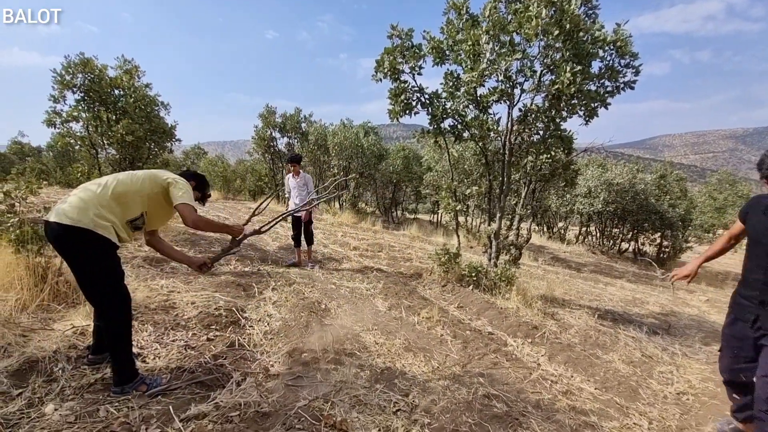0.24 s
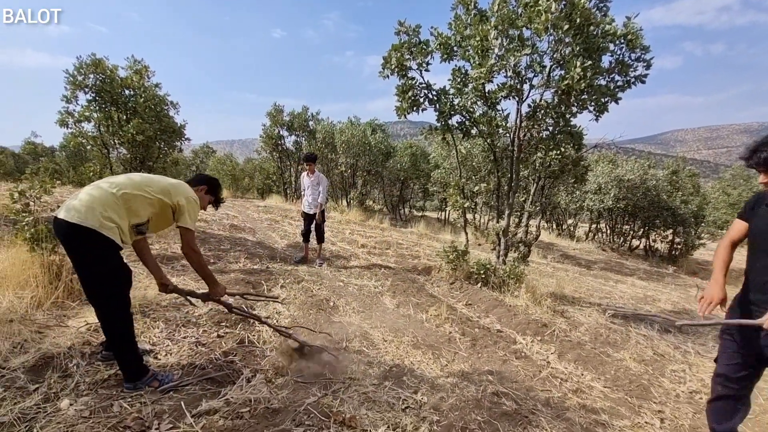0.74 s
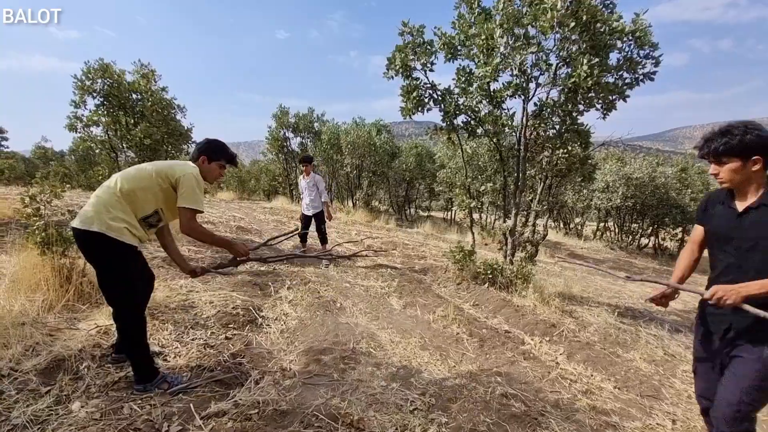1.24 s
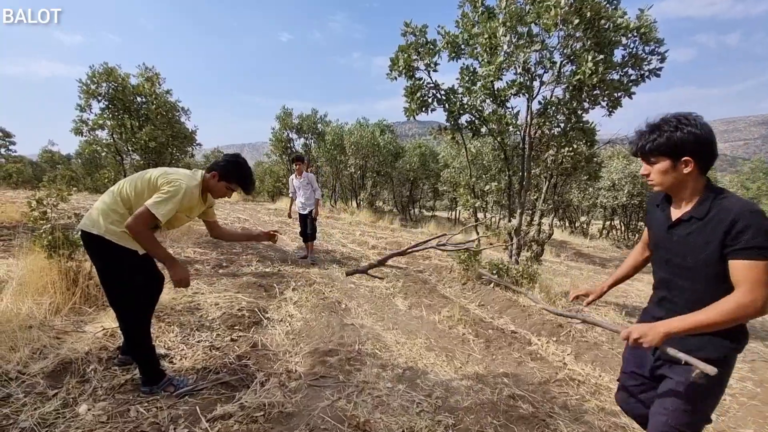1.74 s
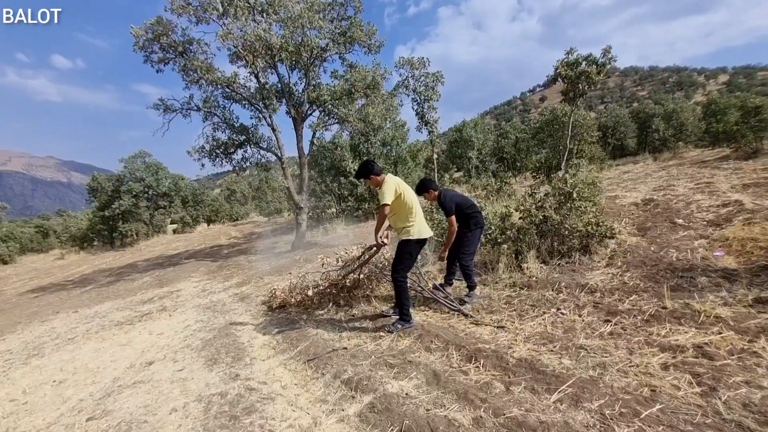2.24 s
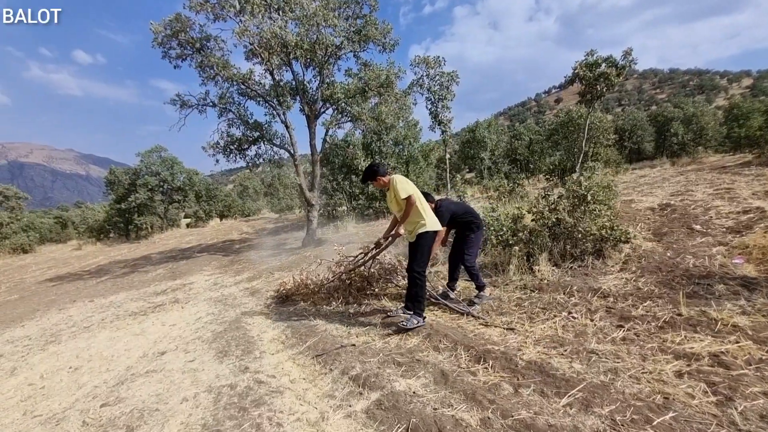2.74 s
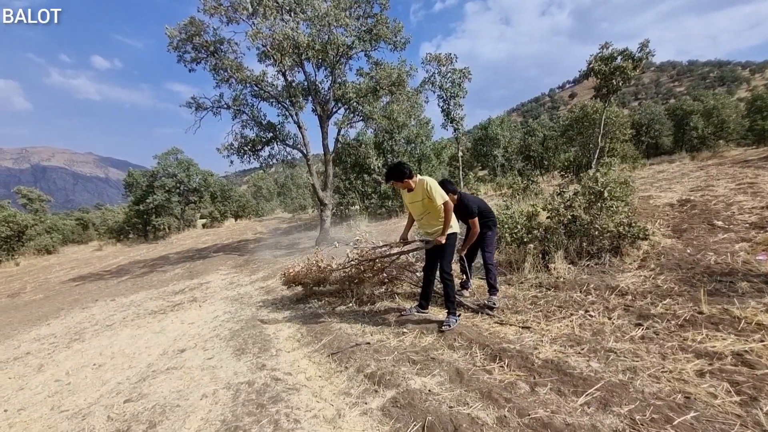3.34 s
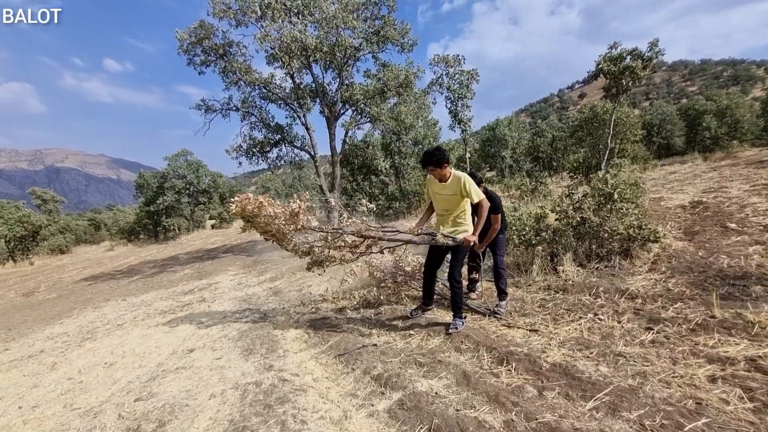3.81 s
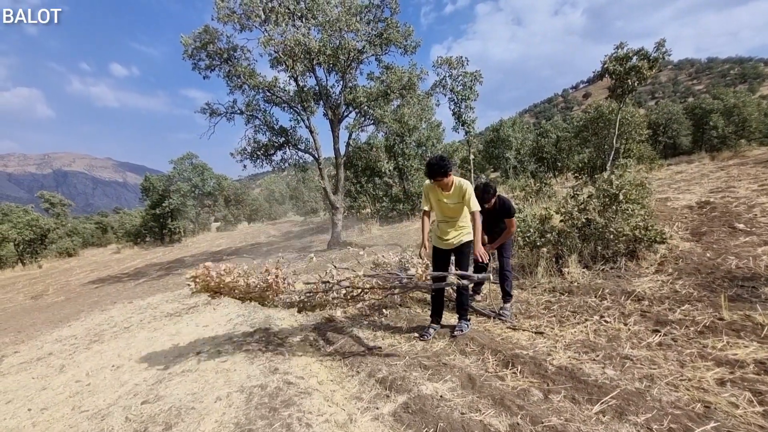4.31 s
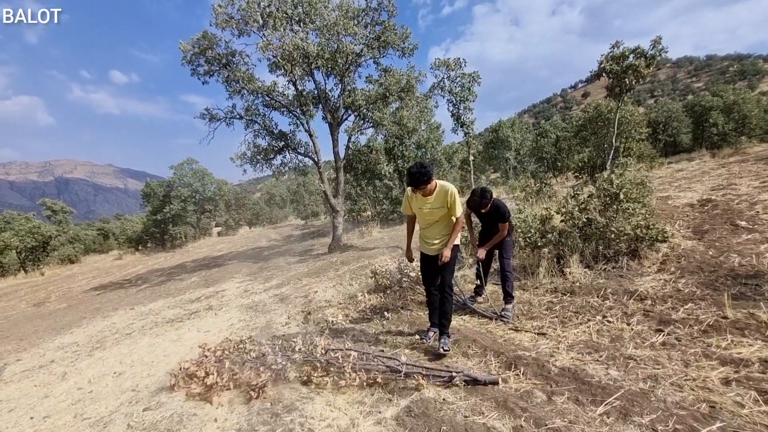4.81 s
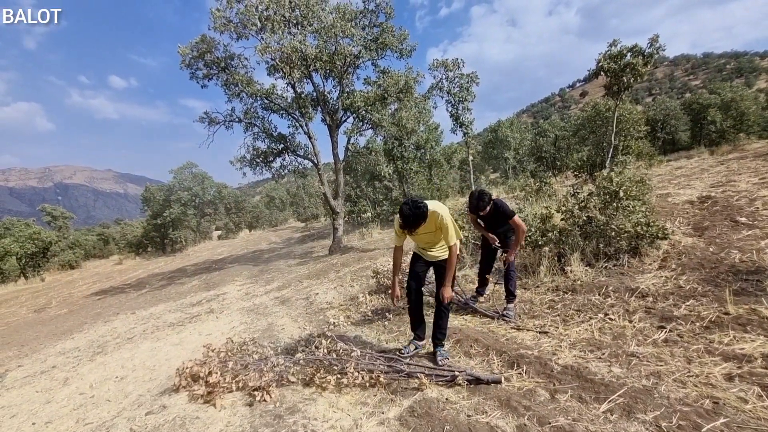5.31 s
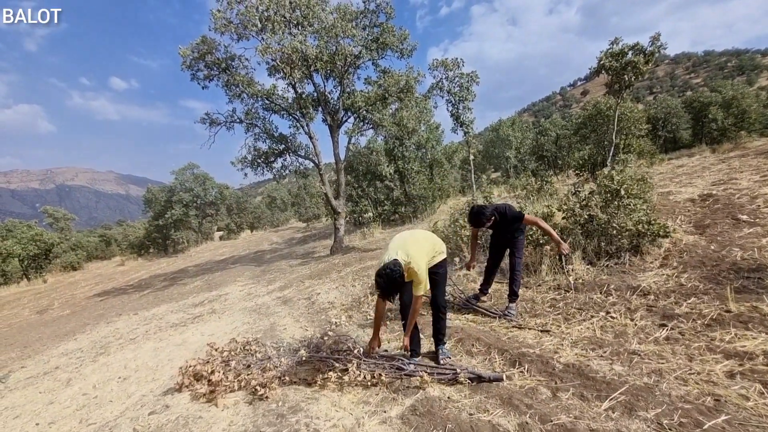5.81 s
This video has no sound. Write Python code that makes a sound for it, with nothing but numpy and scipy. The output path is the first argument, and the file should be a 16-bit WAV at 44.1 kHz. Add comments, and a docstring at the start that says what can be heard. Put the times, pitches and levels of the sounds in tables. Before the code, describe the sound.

Dry branches beaten on the ground snap sharply amid faint grass rustle, then leafy brush crackles, swishes and drops on a breezy hillside.

```python
"""Dry branches are beaten on the ground: twigs snap as short noise bursts that ring, and sticks rap.
Leafy brush is dragged, lifted and dropped on a hillside: its rustle is noise made of tiny cracks.
The hand-held camera body knocks with a hollow ring; wind noise and slaps hit mostly the left port.
Two scenes follow each other: near 1.94 s the rustle switches abruptly from dry grass to dead leaves."""
import sys
import numpy as np
from scipy import signal
from scipy.fft import rfft, irfft
from scipy.io import wavfile
from scipy.ndimage import uniform_filter1d

SR = 44100
rng = np.random.default_rng(int(sys.argv[2]) if len(sys.argv) > 2 else 0)


def master(y):
    """Save y as 16-bit WAV."""
    cut = np.clip(np.atleast_2d(y).T, -1, 1)
    pcm = np.round(cut * 32767)  # scale
    wavfile.write(sys.argv[1], SR, pcm.astype(np.int16))


N = 267246  # length in samples

LOW_HZ, HIGH_HZ = 2500, 9500  # borders between the low, middle and high zones


def amp(db):
    """Turns decibels into gain."""
    return 10 ** (np.asarray(db) / 20)


def evened(x):
    """Scales to rms 1."""
    return x / np.sqrt(np.mean(x ** 2) + 1e-20)


def read(points, hz):
    """Reads a frequency table on a log-frequency axis."""
    f, value = np.transpose(points)
    return np.interp(np.log(hz + 1), np.log(f + 1), value)


def columns(rows, t):
    """Reads every column of a curve at times t."""
    s, *values = np.transpose(rows)
    return [np.interp(t, s, v) for v in values]


def add(mix, s, sound):
    """Mixes a two-channel sound in at time s."""
    part = mix[:, round(s * SR):][:, :sound.shape[1]]
    part += sound[:, :part.shape[1]]


def sides(pan_db):
    """Left and right gains whose mean is 1; positive values lean left."""
    pair = amp(np.array([pan_db / 2, -pan_db / 2]))
    return pair / pair.mean(0)


def zones(hz):
    """Soft masks for the low, middle and high part of the spectrum."""
    low = 1 / (1 + (hz / LOW_HZ) ** 8)
    high = 1 / (1 + (HIGH_HZ / (hz + 1)) ** 24)
    return low, (1 - low) * (1 - high), high


def colour(points, hz):
    """Cuts a spectrum into zones of power 1, so that each zone can be given its own level."""
    shape = amp(read(points, hz))
    return np.array([shape * z / np.sqrt(np.mean((shape * z) ** 2)) for z in zones(hz)])


def causal(db):
    """Minimum-phase impulse response (energy as early as possible) of a gain on 2049 bins."""
    log_gain = np.log(amp(np.maximum(db, -100)))
    circle = np.concatenate([log_gain, log_gain[-2:0:-1]])
    phase = -signal.hilbert(circle).imag
    return np.fft.ifft(np.exp(circle + 1j * phase)).real[:2048]


def ringing(x, modes, t60):
    """Passes x through decaying modes (natural tones) with energy 1 in all."""
    t = np.arange(1500) / SR
    tones = sum(amp(db) * np.sin(2 * np.pi * hz * t) for hz, db in modes)
    ring = amp(-60 * t / t60) * tones
    return signal.oaconvolve(x, ring[None] / np.linalg.norm(ring), axes=1)[:, :x.shape[1]]


# Twigs snapping. Each row: start in seconds, middle level in dB, ring of the twig in Hz,
# wood level below 2.5 kHz in dB, sheen level above 9.5 kHz in dB, lean to the left in dB.
TWIG_SNAPS = [(0.051, -37, 4560, -33.5, -55, 1), (0.074, -33, 3540, -49, -55, -4.5),
              (0.362, -38, 4620, -71, -43, -1), (0.4646, -36.5, 7300, -52.5, -44, 3),
              (0.521, -36, 7800, -72, -40, 1), (0.5643, -20, 7060, -23, -30.5, 30),
              (0.5717, -16, 7900, -45, -35, 22), (0.5778, -14.5, 2930, -20, -41, 28),
              (0.5803, -11.5, 4500, -18, -31, 13), (0.596, -33, 6500, -35, -45, -5),
              (0.6031, -16.5, 4650, -23, -38, -12), (0.623, -26, 5540, -27, -37, 2),
              (0.6551, -27, 4280, -38, -55, 2), (0.665, -24, 3360, -24.5, -47, -2.5),
              (0.744, -38, 7400, -46, -58, -3.5), (0.82, -32, 4200, -58, -47, -4),
              (1.019, -35, 7000, -70, -42, -8), (1.0292, -26, 7940, -70.5, -34, -9.5),
              (1.0593, -20, 6000, -44.5, -21.5, -5.5), (1.0787, -27.5, 5700, -67, -36, -9),
              (1.0912, -35.5, 6500, -72, -37, -17), (1.1223, -34, 6000, -67, -42, -1),
              (1.135, -28.5, 7850, -56, -40, -7), (1.1652, -41, 7500, -76, -49, -8.5),
              (1.181, -34, 7240, -69, -41.5, -7.5), (1.188, -39, 7450, -75, -44, -10),
              (1.223, -39, 3900, -81, -65, 1.5), (1.2744, -57, 3600, -72, -64, -3),
              (1.3529, -9.5, 4770, -31.5, -14.5, -6), (1.3714, -25, 7540, -44, -41, 15),
              (1.4562, -41, 7600, -44, -41, -14), (1.8413, -40.5, 7430, -56.5, -49.5, -16),
              (2.064, -31, 4550, -54, -29, -7), (2.1517, -32, 4300, -41, -35, -7),
              (2.545, -30, 4630, -65, -53, -11), (2.9966, -35, 4550, -60, -53, -4),
              (3.0239, -38, 6550, -38, -34.5, -3), (3.274, -22.5, 4370, -41, -50, -5),
              (3.361, -29, 5140, -46, -26, -3.5), (3.3724, -29, 5150, -50, -28, -4),
              (3.389, -23.5, 4670, -45, -24, -5), (3.427, -33, 4620, -29, -29, -4.5),
              (3.448, -19, 5120, -38, -29, -8), (3.5188, -11, 7640, -40, -31, -2),
              (3.817, -27, 5150, -64, -37, -6), (3.897, -21.5, 8260, -41, -36, -8),
              (4.0835, -36, 4700, -56, -39, -10), (4.2392, -26, 6200, -47, -59, -1),
              (4.258, -36, 4600, -51, -54, -5), (4.2952, -34.5, 7190, -42, -42, -19),
              (4.3905, -21.5, 8500, -25.5, -31, 0), (4.8013, -17, 7360, -28, -51, -9),
              (5.147, -28, 4900, -46, -35.5, -5), (5.1793, -19.5, 7500, -38, -33, -3.5),
              (5.1868, -23, 6680, -44, -36, -8), (5.2806, -38, 6500, -77, -50.5, -4),
              (5.3561, -20, 7460, -55, -37, -1), (5.3626, -13, 7240, -23, -35, 8),
              (5.3736, -9.5, 5000, -17, -26, 5), (5.3878, -23, 7000, -53, -33, -16),
              (5.411, -30.5, 4530, -23, -52, -1), (5.58, -31.5, 5100, -42, -47, -6),
              (5.7468, -33.5, 8000, -41, -46, -1), (5.842, -29.5, 7500, -47, -52, -2.5),
              (6.0407, -35.5, 6900, -61, -56, -3)]
# Tone of the snaps. Each row: frequency in Hz, relative level in dB per Hz.
SNAP_SPECTRUM = [(240, -30.5), (400, -13.5), (927, -26), (1120, -19), (1480, -16.5), (2150, -12),
                 (2510, -1.5), (3430, -2.5), (6190, -6), (6800, -2), (9280, -12), (15000, -6.5),
                 (16500, -14)]
# Natural tones of a dry branch. Each row: frequency in Hz, relative level in dB.
BRANCH_MODES = [(780, -39), (960, -2), (1500, -1.5), (1980, 4.5), (2250, 1)]
CRACK_MS, SPLINTERS_DB = 2.06, -6.5  # crack down to 37 % after this time; start of the splinter tail
WOOD_T60, TWIG_T60 = 0.014, 0.006  # dry wood rings briefly: seconds to fall 60 dB
WOOD_FLOOR_HZ = 665  # a branch radiates little below this


def snaps():
    """Each snap is a short crack of fibres that rings twig and branch, and a weaker tail of splinters."""
    t = np.arange(4000) / SR
    wood, twigs, sheen = trains = np.zeros((3, 2, N))
    for s, level_db, twig_hz, wood_db, sheen_db, pan_db in TWIG_SNAPS:
        a, b = np.sign(rng.standard_normal((2, len(t))))
        onset = 1 - np.exp(-t / 0.00053)
        noise = onset * np.array([a, 0.07 * a + 1.16 * b]) * sides(pan_db)[:, None]
        crack = noise * np.exp(-(t * 1000 / CRACK_MS) ** 2)
        tail = noise * amp(SPLINTERS_DB - 60 * t / 0.1)
        # thin twigs radiate little below their ring
        thin = signal.lfilter(*signal.butter(2, 0.86 * twig_hz, "high", fs=SR), crack + tail)
        branch_ring = ringing(crack, BRANCH_MODES, t60=WOOD_T60)
        twig_ring = ringing(crack, [(twig_hz, 0)], t60=TWIG_T60)
        add(wood, s, amp(wood_db) * (0.24 * (crack + tail) + 0.1 * branch_ring))
        add(twigs, s, amp(level_db) * (0.5 * thin + 0.42 * twig_ring))
        add(sheen, s, amp(sheen_db) * (crack + 0.4 * tail))
    trains[0] = signal.lfilter(*signal.butter(2, WOOD_FLOOR_HZ, "high", fs=SR), wood)
    gains = colour(SNAP_SPECTRUM, np.fft.rfftfreq(4096, 1 / SR))
    filters = [causal(20 * np.log10(gain + 1e-9)) for gain in gains]
    return sum(signal.oaconvolve(x, k[None], axes=1)[:, :N] for x, k in zip(trains, filters))


# A thick stick raps on wood or ground. Each row: start in seconds, level in dB, pitch in Hz,
# lean to the left in dB.
STICK_RAPS = [(0.054, -45.5, 740, 6), (0.141, -50.5, 1010, 2), (0.223, -50.5, 1500, 12),
              (0.4634, -59, 760, 17), (0.5816, -14, 2150, 12), (0.655, -42, 980, 5), (0.664, -40.5, 990, 4),
              (1.358, -39, 1030, 8), (1.368, -40, 890, 10), (4.19, -41.5, 670, 7), (4.238, -45, 1070, -2),
              (4.257, -42, 925, -5), (4.293, -44, 790, -8), (4.335, -49, 855, -3),
              (4.3903, -34.5, 1950, 20), (5.361, -32, 1970, 20), (5.3719, -25.5, 1640, 8),
              (5.41, -33, 1975, 10), (5.685, -41.5, 1800, 11)]
# Natural tones of the stick. Each row: multiple of the pitch, relative level in dB.
STICK_MODES = [(1.0, 4), (1.4, -3), (0.75, -15), (1.9, -8), (2.6, -3)]
STICK_CYCLES = 35  # cycles of the pitch until the ring has fallen 60 dB
# contact in ms (down to 37 %) for a rap at SOFT_DB; dB shorter per dB harder
CONTACT_MS, SOFT_DB, HARDENING = 10.8, -42, 0.53


def raps():
    """A ragged contact, shorter for harder blows, rings the modes of the stick."""
    out, t = np.zeros((2, N)), np.arange(3000) / SR
    for s, level_db, hz, pan_db in STICK_RAPS:
        speed = amp(HARDENING * (level_db - SOFT_DB))
        a, b = rng.standard_normal((2, len(t))) * np.exp(-t * 1000 / CONTACT_MS * speed)
        contact = np.array([a, 0.58 * a + 0.63 * b])
        modes = [(multiple * hz, db) for multiple, db in STICK_MODES]
        ring = ringing(contact, modes, t60=STICK_CYCLES / hz)
        add(out, s, amp(level_db) * ring / abs(ring).max() * sides(pan_db)[:, None])
    return out


# Handfuls of leaves and grass stirred. Each row: time of the peak in seconds, level in dB, rise in dB
# per second, fall in dB per second, then stems below 2.5 kHz and sheen above 9.5 kHz,
# both in dB relative to the level.
LEAF_STIRS = [(0.01, -44, 99, 28.5, -17.5, -5.5), (0.722, -46, 98, 32, -19.5, -5),
              (1.39, -46.5, 398, 94, -12.5, -6), (1.526, -56, 48, 53.5, -6, -3.5),
              (1.945, -34, 99, 21, -14, -9), (3.35, -39.5, 75, 51, -12.5, -4.5),
              (3.518, -29.5, 60.5, 60.5, -15, -10), (4.07, -48.5, 10.5, 33, -13, -7.5),
              (4.29, -55.5, 20, 80, -11, -33), (4.539, -20, 292, 86.5, -14.5, -13),
              (4.798, -33.5, 95, 89, -14, -12.5), (5.098, -51, 20, 204, -17, -10),
              (5.42, -45.5, 400, 57, -9, -8), (5.522, -47.5, 80, 103, -32, -9),
              (5.645, -48.5, 99, 82, -11, -10), (6.05, -59.5, 31, 25, -19, -21)]
STILL_DB, STILL_STEMS_DB, STILL_SHEEN_DB = -68.5, -76, -74  # the hillside at rest
CUT_S, DROP_S = 1.939, 4.435  # start of the second scene; brush thrown down, in seconds


def stirring(t):
    """Levels of rustle, stems and sheen: each stir swells, dies away and stays within its scene."""
    power = amp([[STILL_DB], [STILL_STEMS_DB], [STILL_SHEEN_DB]]) ** 2
    for s, peak_db, rise, fall, stems_db, sheen_db in LEAF_STIRS:
        slope = np.where(t < s, rise, fall)
        same_scene = (t < CUT_S) == (s < CUT_S)
        level = amp(peak_db - slope * abs(t - s)) * same_scene
        power = power + (level * amp([[0], [stems_db], [sheen_db]])) ** 2
    return 10 * np.log10(power)


def crackle(per_s, spread_db, grain_ms, bed):
    """Noise whose envelope is a shower of tiny leaf cracks over an even bed."""
    hits = rng.random(N) < per_s / SR
    size = amp(spread_db * np.minimum(rng.exponential(1, N), 5)) * hits / np.sqrt(per_s)
    grain = np.exp(-np.arange(1500) / SR * 1000 / grain_ms)
    power = abs(signal.oaconvolve(size ** 2, grain)[:N])
    return evened(np.sqrt(bed + power / power.mean()) * rng.standard_normal((2, N)))


# Tone of dry grass in the first scene. Each row: frequency in Hz, relative level in dB per Hz.
GRASS_SPECTRUM = [(150, -27), (250, 2.5), (438, -15.5), (795, -12.5), (1190, -16.5), (1320, -14),
                  (2280, -10.5), (4430, 0), (6290, -4.5), (7760, 4.5), (9420, -15.5), (15100, -9),
                  (16500, -47)]
# Tone of dead leaves in the second scene. Each row: frequency in Hz, relative level in dB per Hz.
LEAF_SPECTRUM = [(150, -25.5), (250, -10.5), (360, -20), (570, -11.5), (780, -21.5), (1000, -7),
                 (1200, -16), (1470, -7.5), (1800, -13.5), (4590, -4), (7500, -8.5), (10500, -16.5),
                 (13000, -5.5), (15700, -18), (16500, -27)]
# Tone of brush thrown down close by. Each row: frequency in Hz, relative level in dB per Hz.
DROP_SPECTRUM = [(150, -26), (250, 0), (337, -14.5), (570, -5), (809, -12.5), (1150, -7), (1980, -12),
                 (2960, -10.5), (7240, -4), (9250, -16.5), (15100, -11), (16500, -47)]
# Likeness of left and right. Each row: frequency in Hz, likeness (1 same, 0 unrelated).
SIDE_LIKENESS = [(60, -0.05), (180, -0.68), (550, 1), (1650, 0.37), (4970, 0.14), (15000, 0.036)]
# Balance of the first scene. Each row: frequency in Hz, lean to the left in dB.
FIRST_BALANCE = [(60, 24), (180, 19), (550, 5), (1650, 7.5), (4970, -6), (15000, -4)]
# Balance of the ports in the second scene. Each row: frequency in Hz, lean to the left in dB.
SECOND_BALANCE = [(60, -5), (130, 46), (290, 4), (640, 2.5), (1410, 6), (3100, -3), (6820, -6.5),
                  (15000, -3)]


def rustle():
    """Dead leaves and grass rub and crack; harder handling makes the cracks denser."""
    level_db = stirring(np.arange(N) / SR)[0]
    density = 700 * amp(0.45 * (level_db + 50.5))  # cracks per second
    cracks = crackle(density, spread_db=1.0, grain_ms=3.3, bed=0.13)
    hz, t, (a, b) = signal.stft(cracks, SR, nperseg=512, noverlap=384)
    mid_db, low_db, high_db = stirring(t)
    colours = np.dstack([colour(c, hz) for c in (GRASS_SPECTRUM, LEAF_SPECTRUM, DROP_SPECTRUM)])
    low, mid, high = colours[:, :, np.digitize(t, [CUT_S, DROP_S])]
    shape = amp(low_db - mid_db) * low + mid + amp(high_db - mid_db) * high
    # random patches in time and frequency make the rustle uneven
    patches = uniform_filter1d(rng.standard_normal(a.shape), 20, axis=1)
    patches = evened(uniform_filter1d(patches, 8, axis=0))
    same = np.clip(read(SIDE_LIKENESS, hz), -1, 1)[:, None]
    pair = np.array([a, same * a + np.sqrt(1 - same ** 2) * b])
    first, second = read(FIRST_BALANCE, hz)[:, None], read(SECOND_BALANCE, hz)[:, None]
    z = pair * shape * amp(1.84 * patches) * sides(np.where(t < CUT_S, first, second))
    return amp(0.5 + level_db) * signal.istft(z, SR, nperseg=512, noverlap=384)[1][:, :N]


# Knocks on the camera body. Each row: start in seconds, tick level in dB, ring level in dB.
BODY_KNOCKS = [(0.575, -32.5, -40), (2.14, -45, -40.5), (2.21, -48, -46), (2.519, -56, -41),
               (2.706, -45.5, -74), (2.794, -53, -46), (2.945, -49.5, -47), (3.111, -45.5, -40.5),
               (3.233, -47, -50.5), (3.798, -54, -59), (3.849, -50, -54), (3.967, -54, -46.5),
               (4.188, -43, -34), (4.238, -43, -42), (4.283, -42.5, -44.5), (4.547, -35.5, -39),
               (4.773, -39, -44), (4.881, -61, -56), (5.344, -56, -39), (5.616, -51, -39),
               (5.683, -45.5, -49.5), (5.964, -43, -37), (5.99, -67, -52)]
# Natural tones of the body. Each row: frequency in Hz, relative level in dB, seconds to fall 60 dB.
BODY_MODES = [(236.4, -4, 0.16), (262.3, 6.5, 0.056), (360, -3, 0.089), (465, -9, 0.14)]
SWELL_MS, RING_PAN_DB, TICK_PAN_DB = 38.4, 18, 25  # push down to 37 %; leans to the left


def knocks():
    """A dull tick, while the hollow body swells and rings."""
    out, t = np.zeros((2, N)), np.arange(9000) / SR
    ring = sum(amp(db - 60 * t / t60) * np.sin(2 * np.pi * hz * t) for hz, db, t60 in BODY_MODES)
    dull = signal.butter(2, [420, 1600], "band", fs=SR)
    for s, tick_db, ring_db in BODY_KNOCKS:
        a, b = rng.standard_normal((2, len(t)))
        # the grip keeps pushing: noise plus a tone in step with the first mode
        tone = np.sin(2 * np.pi * BODY_MODES[0][0] * t)
        push = np.exp(-(t * 1000 / SWELL_MS) ** 4) * (tone + 10.6 * a)
        boom = signal.oaconvolve(push, ring)[:len(t)]
        tick = signal.lfilter(*dull, b * amp(-60 * t / 0.081))
        add(out, s, amp(ring_db) * boom / abs(boom).max() * sides(RING_PAN_DB)[:, None])
        add(out, s, amp(tick_db) * tick / abs(tick).max() * sides(TICK_PAN_DB)[:, None])
    return out


# Gusts and jolts that slap the left port. Each row: time of the strongest swing in seconds (roughly),
# relative level in dB, rough pitch in Hz.
PORT_SLAPS = [(0.323, -35, 64.5), (0.353, -32.5, 79), (0.577, -31, 170), (0.657, -35, 69),
              (0.811, -41.5, 81), (1.139, -28.5, 74.5), (1.199, -36, 67), (1.23, -40.5, 63),
              (1.383, -39.5, 72.4), (1.58, -32.5, 73), (1.682, -46, 65), (1.739, -29, 112),
              (1.812, -38, 85), (1.942, -36, 108), (1.973, -21, 68), (2.064, -33, 95), (2.17, -30, 70),
              (2.201, -27, 72), (2.287, -28, 74.4), (2.384, -23.5, 109), (2.993, -32.5, 80),
              (3.047, -36.5, 68.6), (3.182, -36.5, 63.4), (4.549, -21.5, 170), (5.377, -35, 71),
              (5.475, -26, 72), (5.506, -22, 91), (5.555, -38, 60.5), (5.588, -23, 80),
              (5.741, -34.5, 68.6), (5.813, -34.5, 78.4), (5.855, -8.5, 97), (5.909, -20, 131),
              (5.944, -34.5, 64), (5.977, -43, 160)]
SWINGS = 1.34  # cycles until the fading has reached 37 %


def slaps():
    """A gust or jolt hits the left membrane: a push, then ever slower swings."""
    out, t = np.zeros((2, N)), np.arange(5000) / SR
    for s, level_db, hz in PORT_SLAPS:
        cycles = hz * t
        turns = 1.163 * cycles ** 0.68  # below 1, the power slows the swings
        envelope = (1 - np.exp(-(cycles / 0.36) ** 2)) * np.exp(-(cycles / SWINGS) ** 2)
        swing = envelope * np.sin(2 * np.pi * turns)
        add(out, s - 0.676 / hz, amp(level_db + 1.0) * swing * sides(63.0)[:, None])
    return out


# Strength of the wind. Each row: time in seconds, relative level in dB, lean to the left in dB.
WIND_CURVE = [(0.0, -53.5, 10), (0.32, -55.5, 35), (0.45, -60, 27), (0.66, -51, 37), (0.9, -56.5, 39),
              (1.4, -54.5, 18), (1.88, -47, 24.5), (1.96, -28, 19), (2.03, -45, 4), (2.24, -35.5, -1),
              (2.41, -45, 24), (2.65, -73.5, 15), (2.97, -47.5, 9), (3.19, -69, 11), (3.4, -62.5, 33),
              (3.98, -84, 25), (4.74, -68, 23), (4.95, -82, 16), (5.32, -75, 9), (5.55, -40.5, 49),
              (5.75, -62.5, 27), (5.86, -28.5, 31), (6.06, -57, 10)]
# Tone of the wind. Each row: frequency in Hz, relative level in dB per Hz.
WIND_SPECTRUM = [(10, -40), (25, -12), (50, 0), (75, 1), (110, -7), (150, -16), (220, -30), (350, -46),
                 (600, -75)]


def wind():
    """Lumpy turbulence at the ports, unrelated between them."""
    hz = np.fft.rfftfreq(N, 1 / SR)
    # the right port flutters faster: a boost around 300 Hz on that side only
    flutter_db = np.outer([0, 1], 28.0 * np.exp(-np.log((hz + 1) / 300) ** 2 / 0.12))
    gain = amp(read(WIND_SPECTRUM, hz) + flutter_db)
    turbulence = irfft(rfft(rng.standard_normal((2, N))) * gain, N)
    lumps = uniform_filter1d(uniform_filter1d(rng.standard_normal((2, N)), 900), 900)
    lumpy = evened(turbulence * amp(4.8 * evened(lumps)))
    level_db, pan_db = columns(WIND_CURVE, np.arange(N) / SR)
    return amp(level_db + 2.5) * lumpy * sides(pan_db)


def scene():
    """All sources together."""
    return snaps() + raps() + rustle() + knocks() + slaps() + wind()


def record(dry):
    """The microphone's bass roll-off at 30 Hz, then the recorder's band limit at 16 kHz."""
    rolled = signal.lfilter(*signal.butter(2, 30, "high", fs=SR), dry)
    band_limit = signal.firwin(511, 16000, window=("kaiser", 9), fs=SR)
    return signal.oaconvolve(rolled, band_limit[None], "same")


dry = scene()
out = record(dry)
master(out)
```